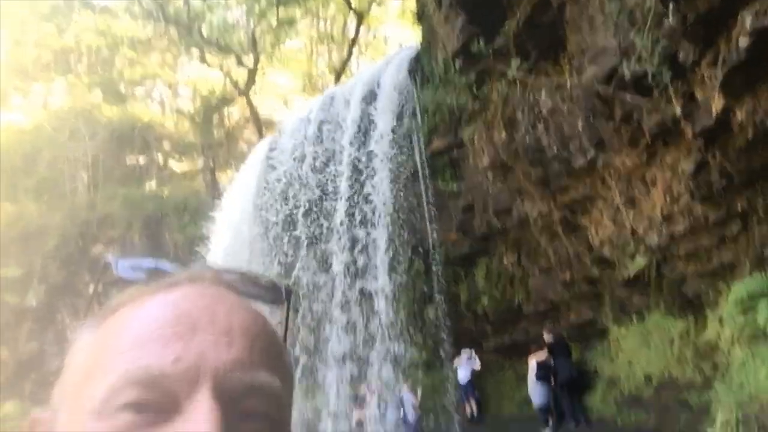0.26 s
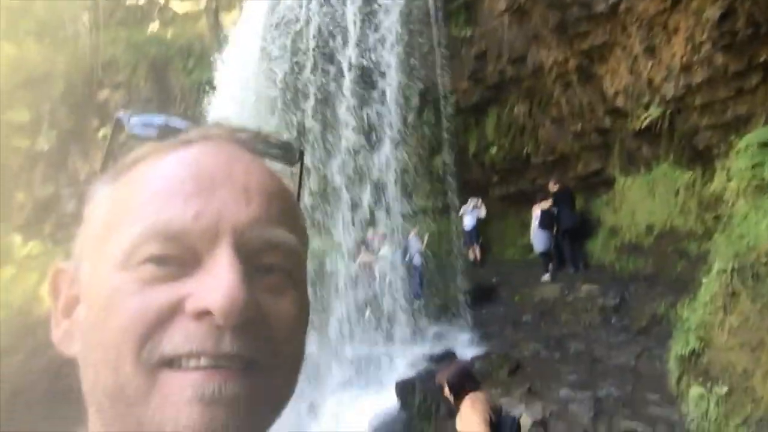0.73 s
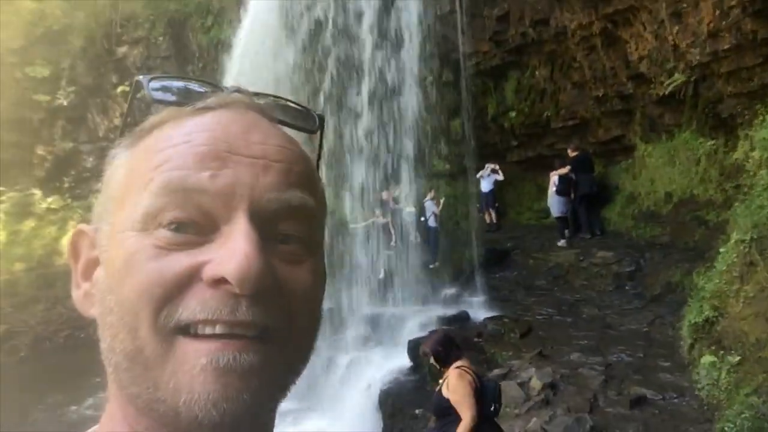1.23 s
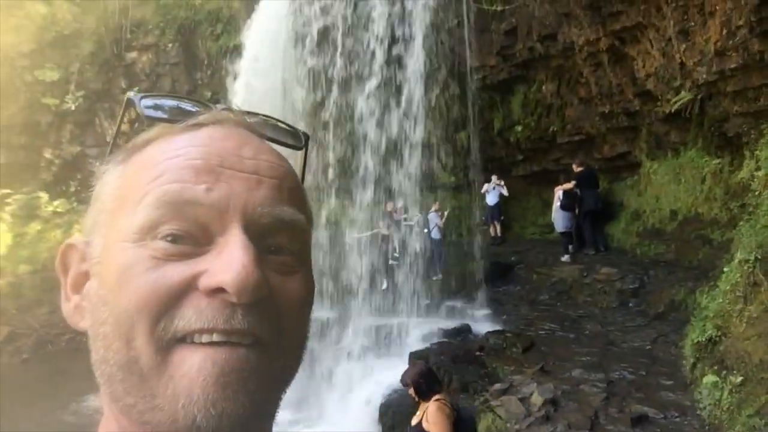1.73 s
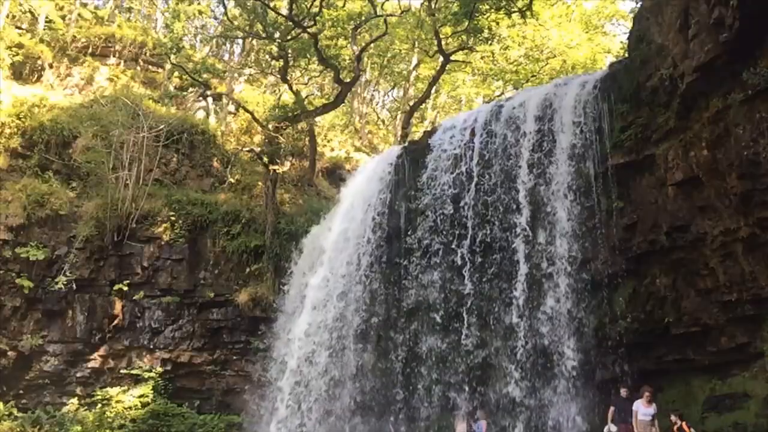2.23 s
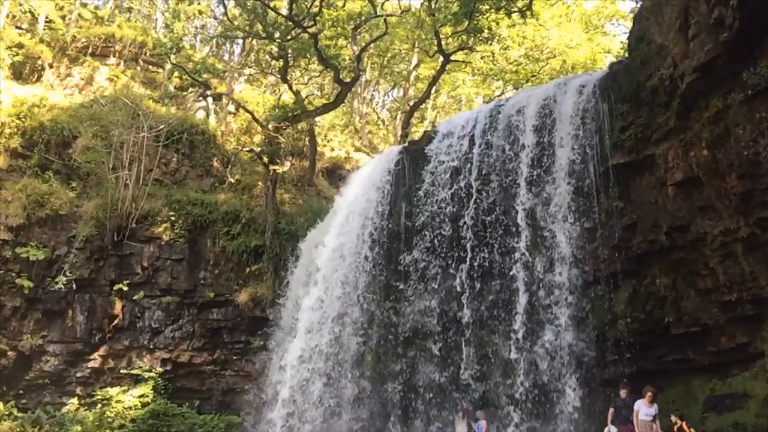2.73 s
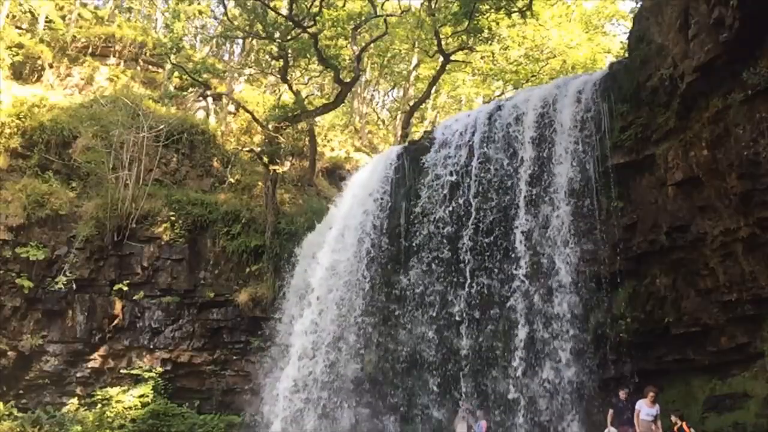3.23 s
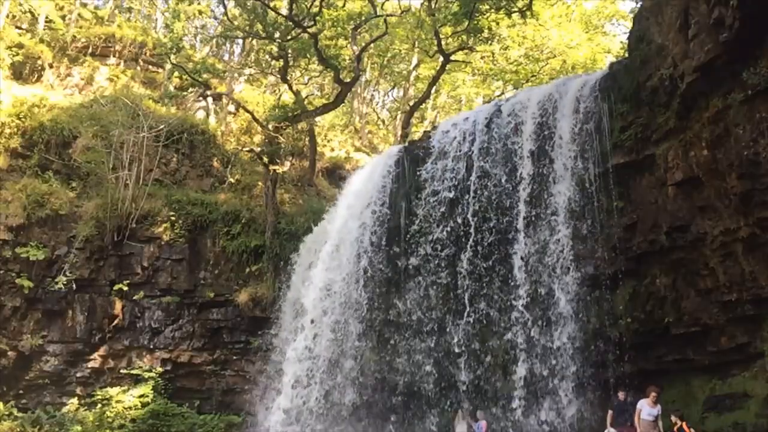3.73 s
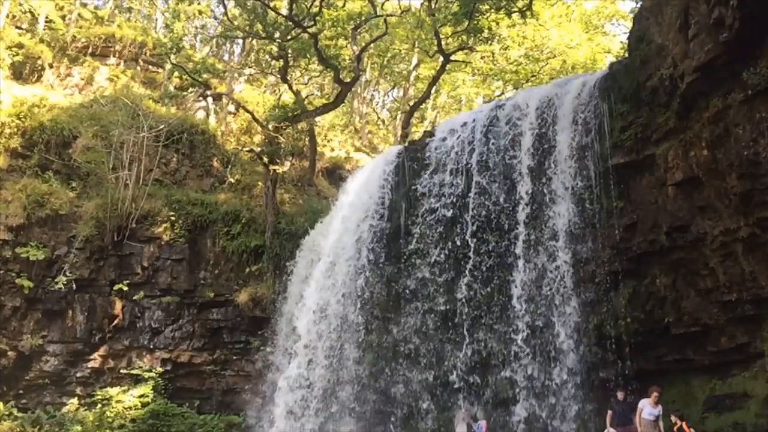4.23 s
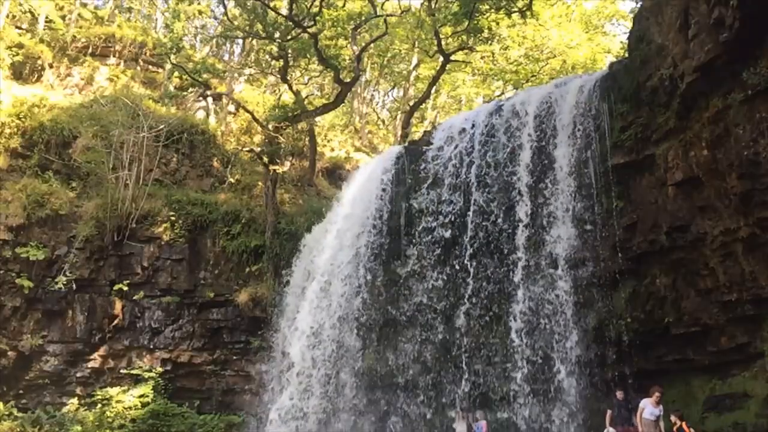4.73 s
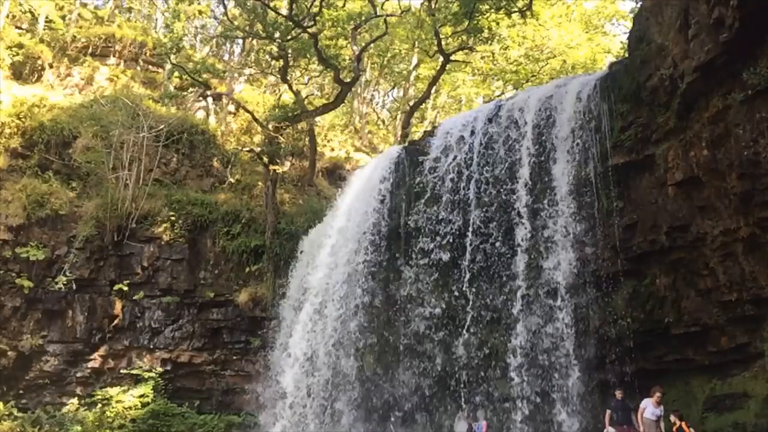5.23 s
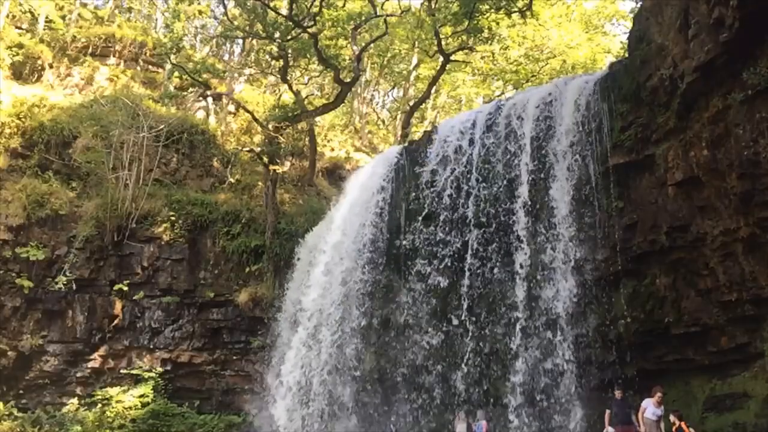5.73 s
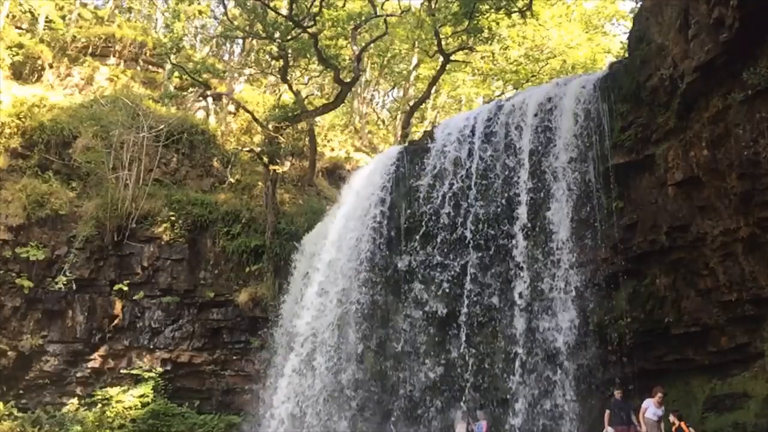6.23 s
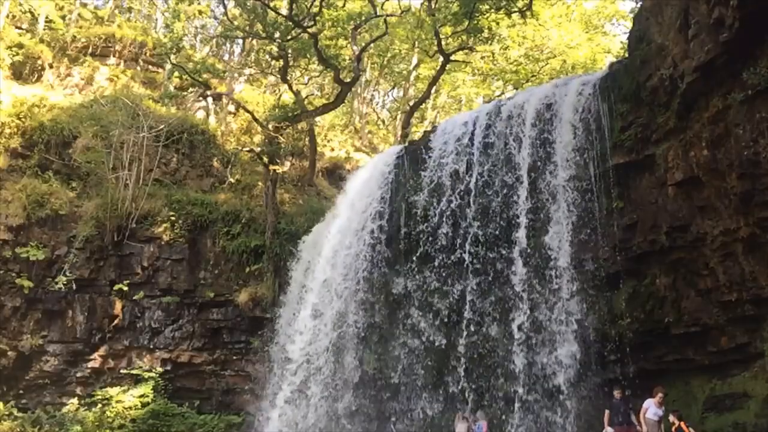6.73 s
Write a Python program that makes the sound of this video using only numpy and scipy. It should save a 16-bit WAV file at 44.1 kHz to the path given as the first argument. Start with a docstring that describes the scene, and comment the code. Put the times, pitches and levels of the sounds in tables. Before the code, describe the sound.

Bright splashing waterfall rush with a dull microphone bump, then a tiny gap and a louder, duller roar with rumbling air gusts.

```python
"""First comes a bright splashing rush beside the overhang of a waterfall, with one soft bump on the microphone;
after a brief gap, a louder, duller roar in front of the fall, with air rumbling on the microphone.
The water is noise for countless far impacts, clicks for near drops and decaying sines for bubbles, then filtered.
The bump is a filtered impulse; the air is low noise swelling in gusts. Linear interpolation between
sparse samples lays a thin treble fizz over the second spot."""
import sys
import numpy as np
from scipy import signal
from scipy.fft import rfft, irfft
from scipy.io import wavfile

SR = 44100
rng = np.random.default_rng(int(sys.argv[2]) if len(sys.argv) > 2 else 0)


def inscribe(sig):
    """Save sig as 16-bit PCM at rate SR to the path in sys.argv[1].

    A 1-D sig is mono; a 2-D sig holds one channel per row.
    Samples are clipped to [-1, 1] before scaling.
    """
    pcm = np.round(np.clip(np.atleast_2d(sig).T, -1, 1) * 32767)
    wavfile.write(sys.argv[1], SR, pcm.astype(np.int16))


N = 307818

# Spectrum of the water beside the overhang. Each row: frequency in Hz, relative power density in dB.
SPLASH_SPECTRUM = [(28, -28), (37, -22), (48, -11.5), (75, -8), (135, -3.5), (400, -5.5), (500, -7),
                   (650, -11), (950, -10), (1400, -14), (2300, -10.5), (2900, -19), (3500, -31),
                   (7000, -29.5), (12000, -32.5), (15700, -48)]
# Its resonances and hollows. Each row: centre in Hz, width at half height in Hz, rise in dB.
SPLASH_RESONANCES = [(73, 18, 5), (97, 18, -6), (136.5, 13, 6), (225, 64, 4), (313, 20, -6),
                     (5110, 1060, -9), (6720, 1440, 7), (10600, 240, -6)]
# Spectrum of the water in front of the fall. Each row: frequency in Hz, relative power density in dB.
ROAR_SPECTRUM = [(20, -1), (60, 2.5), (110, 2.5), (180, -2.5), (450, -1.5), (820, -2), (950, -6),
                 (1150, -6.5), (1500, -10.5), (2300, -25.5)]
# Its resonances and hollows. Each row: centre in Hz, width at half height in Hz, rise in dB.
ROAR_RESONANCES = [(65, 13, -4), (123, 13, 1), (225, 49, 2), (608, 38, -3), (696, 39, 0.5),
                   (1307, 110, -4.5)]
# Spectrum of the air rumbling on the microphone. Each row: frequency in Hz, relative power density in dB.
RUMBLE_SPECTRUM = [(3, -15.5), (8, 3.5), (16, 10.5), (30, 0.5), (50, -7), (90, -10.5), (250, -58),
                   (1000, -89)]
# Gusts of that air. Each row: crest in seconds, length at half height in seconds,
# rise of the deep rumble in dB, rise of the flutter in dB.
GUST_SWELLS = [(2.22, 0.15, 1.5, 3), (2.82, 0.25, 1.5, 12.5), (2.98, 0.18, 4.5, 4), (3.31, .2, 3, 1),
               (4.02, .2, 4, 0.5), (4.6, 0.2, 1.5, 7), (4.86, .2, 0, 11), (4.99, 0.26, 6.5, 5.5),
               (5.43, .26, 5.5, 1)]
# Swelling and sinking bass beside the overhang. Each row: time in seconds, gain in dB.
BASS_SWELL = [(0, 0), (.25, -1.5), (.58, 3.5), (1.25, -2.5), (1.55, -2), (1.75, -1), (2.1, -2)]
# Random flicker of level in each register, strongest in the treble.
# Each row: lower edge in Hz, depth in dB, changes per second.
FLICKER_REGISTERS = [(300, 0.87, 9), (1100, 0.57, 11), (3200, 1.5, 12), (5600, 1.5, 22)]

TIME = np.arange(N) / SR  # s
FREQS = np.maximum(np.fft.rfftfreq(N, 1 / SR), 1)  # Hz, kept above zero for logarithms and ratios

SPLASH_DB, ROAR_DB = -28, -22.5  # level of the water at each spot, the splash before its bass swells
SPLASH_BASS_HZ = 170  # upper edge of the swelling bass
DRAUGHT_DB, FLUTTER_DB = -29, -43  # rumble and flutter of the air between gusts
BUMP_S = 1.9021  # onset of the knock
# pitch range of the bubbles, and the share by which each rises as it nears the surface
BUBBLE_LOW_HZ, BUBBLE_HIGH_HZ, BUBBLE_RISE = 218.8, 5006, 0.075
COARSE_HZ, COARSE_BAND_HZ = 6000, 2340  # sparse sampling rate, and top of the band that is sampled
# moment of half gain and time constant, for leaving the first spot and arriving at the second
LEAVE_S, FADE_OUT_S = 2.089, 0.0043
ARRIVE_S, FADE_IN_S = 2.134, 0.004
CUTOFF_HZ = 15700  # upper edge of the whole sound


def from_db(db):
    """Logarithmic level: each 20 dB is a tenfold amplitude."""
    return 10 ** (np.asarray(db) / 20)


def rms_one(x):
    """Normalisation: divide by the root mean square to reach unit power."""
    return x / np.sqrt(np.mean(x ** 2) + 1e-20)


def colour(points, modes=()):
    """Spectral envelope: a slope linear in dB over log frequency, plus bell-shaped resonances and hollows."""
    hz, db = np.transpose(points)
    level = np.interp(np.log(FREQS), np.log(hz), db)
    for centre, width, height in modes:
        level = level + height * .5 ** ((2 * (FREQS - centre) / width) ** 2)
    return from_db(level)


def shaped(x, gain):
    """Linear filtering: the spectrum is multiplied by a gain per frequency, then brought to unit power."""
    return rms_one(irfft(rfft(x) * gain, N))


def drift(rate):
    """Low-passed noise: a slow random curve of spread 1, changing about `rate` times a second."""
    return shaped(rng.standard_normal(N), 1 / (1 + (FREQS / rate) ** 2))


def impacts(per_s, spread_db):
    """Random arrivals: clicks of either sign at independent moments, many small and a few large."""
    sizes = from_db(spread_db * np.minimum(rng.exponential(1, N), 4))
    signs = rng.choice([-1, 1], N)
    arrives = rng.random(N) < per_s / SR
    return sizes * signs * arrives


def bubbles(per_s, cycles, spread_db):
    """Bubble resonance: each pocket of trapped air rings, decays by 60 dB in `cycles` and glides upward."""
    out = np.zeros(N)
    sizes = impacts(per_s, spread_db)
    pitches = rng.uniform(BUBBLE_LOW_HZ, BUBBLE_HIGH_HZ, N)
    for start in np.flatnonzero(sizes):
        hz = pitches[start]
        length = min(int(cycles / hz * SR), N - start)
        life = TIME[:length] * hz / cycles  # share of the ringing gone by
        decay = np.exp(-np.log(1000) * life)
        phase = 2 * np.pi * cycles * life * (1 + BUBBLE_RISE * life / 2)
        # high bubbles ring shorter, so the square root keeps power even per Hz
        out[start:start + length] += sizes[start] * np.sqrt(hz) * decay * np.sin(phase)
    return rms_one(out)


def falling_water(drops_per_s, drop_db, bubbles_per_s, bubble_db, cycles, clump_db, clump_rate):
    """Superposition: countless far impacts merge into noise; near drops and bubbles are added to it."""
    wash = rng.standard_normal(N)
    drops = from_db(drop_db) * rms_one(impacts(drops_per_s, spread_db=4.5))
    froth = from_db(bubble_db) * bubbles(bubbles_per_s, cycles, spread_db=1.0)
    # the sheet of water tears into clumps, so it lands unevenly
    clumps = from_db(clump_db * drift(clump_rate))
    return (wash + drops + froth) * clumps


def flickering(x):
    """Amplitude modulation by register: each register flickers in level by a random gain of its own."""
    out, last_gain, spectrum = x, 1, rfft(x)
    for edge_hz, depth_db, rate in FLICKER_REGISTERS:
        gain = from_db(depth_db * drift(rate))
        above_edge = irfft(spectrum / (1 + (edge_hz / FREQS) ** 12), N)
        # the difference replaces the gain of the register below
        out = out + (gain - last_gain) * above_edge
        last_gain = gain
    return rms_one(out)


def coarsely_sampled(x, order=4):
    """Spectral imaging: straight lines between sparse samples mirror the low band into faint treble fizz."""
    low_band = irfft(rfft(x) * (FREQS < COARSE_BAND_HZ), N)
    ticks = np.arange(0, N / SR, 1 / COARSE_HZ)
    samples = np.interp(ticks, TIME, low_band)
    # a time grid `order` times finer limits aliasing into the valleys between the bands
    fine_time = np.arange(order * N) / (order * SR)
    lines = np.interp(fine_time, ticks, samples)
    return signal.resample_poly(lines, 1, order)


def fade(steps):
    """Logistic ramp: half gain at 0, nearly full a few time constants later, dying away before."""
    return .5 + .5 * np.tanh(steps / 2)


def bump(low_hz, high_hz, peak_db):
    """Impulse response: a knock on the microphone is one short push, band-limited to a dull thud."""
    thud = signal.unit_impulse(N, round(BUMP_S * SR))
    for edge_hz, kind in ((low_hz, "high"), (high_hz, "low")):
        thud = signal.sosfilt(signal.butter(4, edge_hz, kind, fs=SR, output="sos"), thud)
    return from_db(peak_db) * thud / np.abs(thud).max()


def draught(flutter_low_hz=60, flutter_high_hz=150):
    """Turbulence: air pushed out by the fall rumbles, smaller eddies flutter higher, and gusts raise both."""
    crest, length, rumble_rise_db, flutter_rise_db = np.transpose(GUST_SWELLS)
    swells = .5 ** ((2 * (TIME[:, None] - crest) / length) ** 2)
    rumble = shaped(rng.standard_normal(N), colour(RUMBLE_SPECTRUM))
    rumble = from_db(DRAUGHT_DB + swells @ rumble_rise_db) * rumble
    band = signal.butter(3, [flutter_low_hz, flutter_high_hz], "band", fs=SR, output="sos")
    flutter = rms_one(signal.sosfilt(band, rng.standard_normal(N)))
    flutter = from_db(FLUTTER_DB + swells @ flutter_rise_db) * flutter
    return rumble + flutter


def splash():
    """Impact noise: dense splashing whose treble flickers, with gurgling bubbles, over a heaving bass."""
    water = falling_water(drops_per_s=1800, drop_db=-11, bubbles_per_s=1500, bubble_db=-6.5,
                          cycles=90, clump_db=.35, clump_rate=14)
    water = shaped(flickering(water), colour(SPLASH_SPECTRUM, SPLASH_RESONANCES))
    bass = irfft(rfft(water) / (1 + (FREQS / SPLASH_BASS_HZ) ** 8), N)
    swell = from_db(np.interp(TIME, *np.transpose(BASS_SWELL)))
    return from_db(SPLASH_DB) * (water - bass + swell * bass)


def roar():
    """Merged impacts: denser drops and bubbles in the plunge pool, filtered to a deep churn."""
    water = falling_water(drops_per_s=4000, drop_db=-14.0, bubbles_per_s=3000, bubble_db=-11.5,
                          cycles=42.0, clump_db=0.4, clump_rate=12)
    return from_db(ROAR_DB) * shaped(water, colour(ROAR_SPECTRUM, ROAR_RESONANCES))


def scene():
    """Succession: the first spot fades out and the second fades in, with a short dip between."""
    beside = splash() + bump(low_hz=110, high_hz=560, peak_db=-8.3)
    in_front = coarsely_sampled(roar() + draught())
    leaving = fade((LEAVE_S - TIME) / FADE_OUT_S)
    arriving = fade((TIME - ARRIVE_S) / FADE_IN_S)
    return (beside * leaving + in_front * arriving)[None]


def record(dry):
    """Band limitation: a steep elliptic low-pass removes the top."""
    return signal.sosfilt(signal.ellip(12, .1, 90, CUTOFF_HZ, fs=SR, output="sos"), dry)


dry = scene()
out = record(dry)
inscribe(out)
```